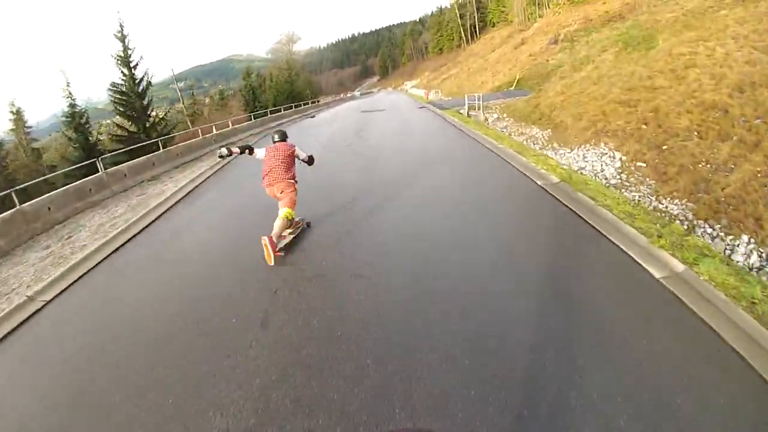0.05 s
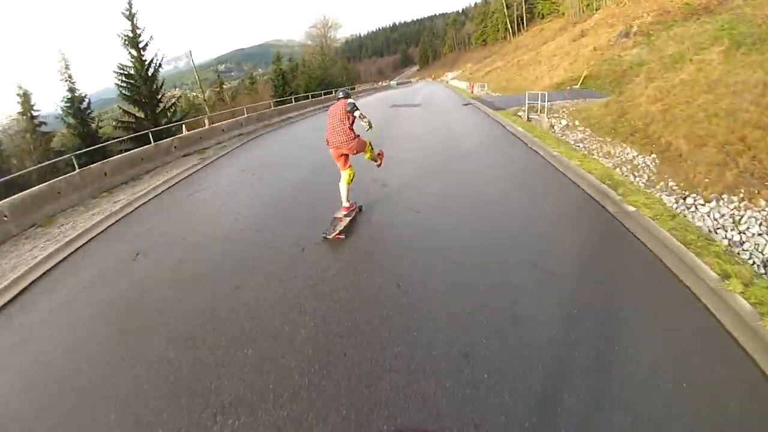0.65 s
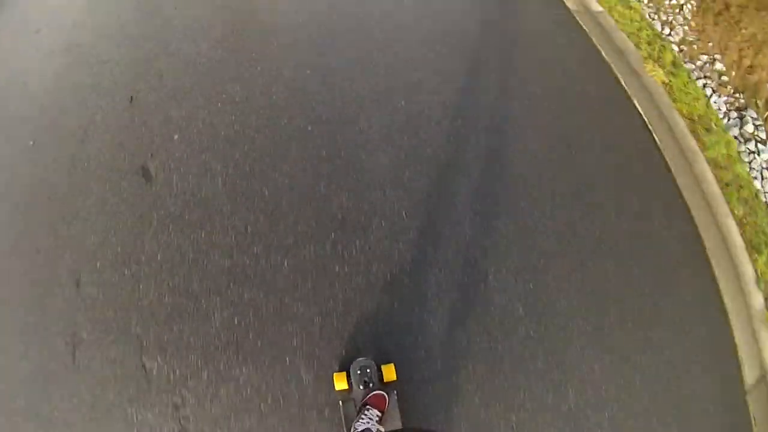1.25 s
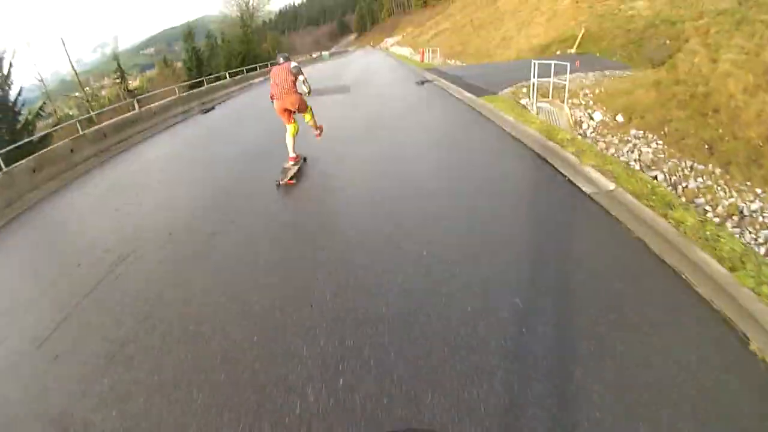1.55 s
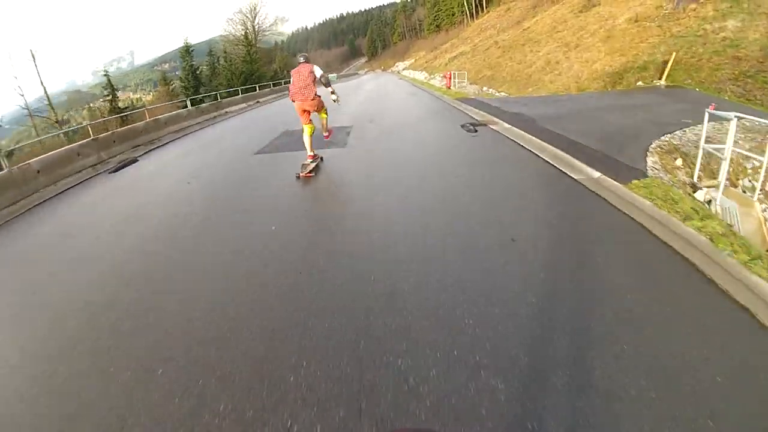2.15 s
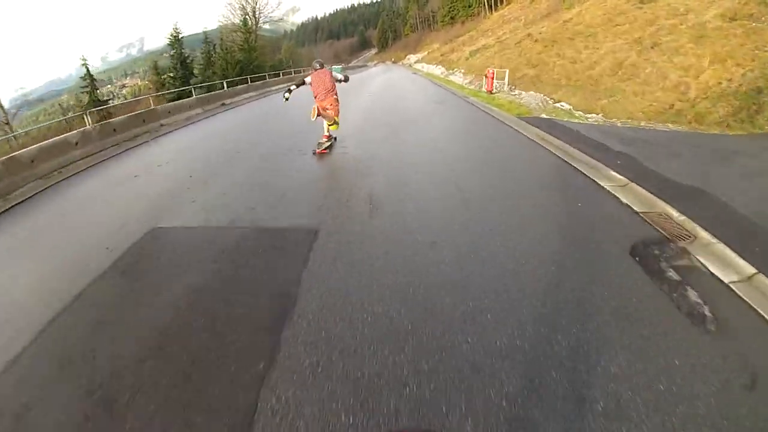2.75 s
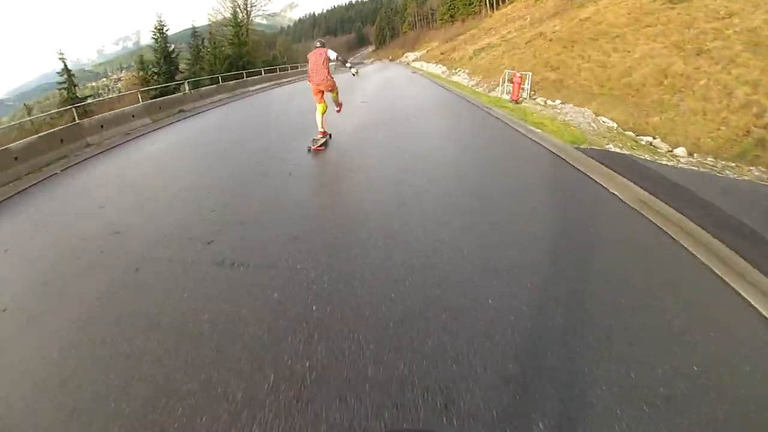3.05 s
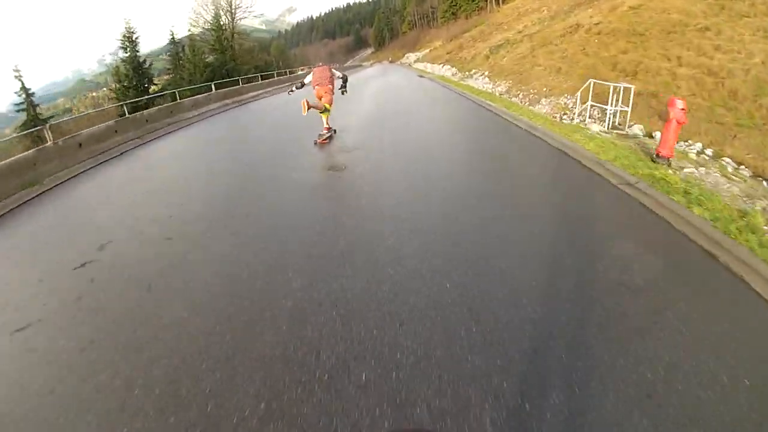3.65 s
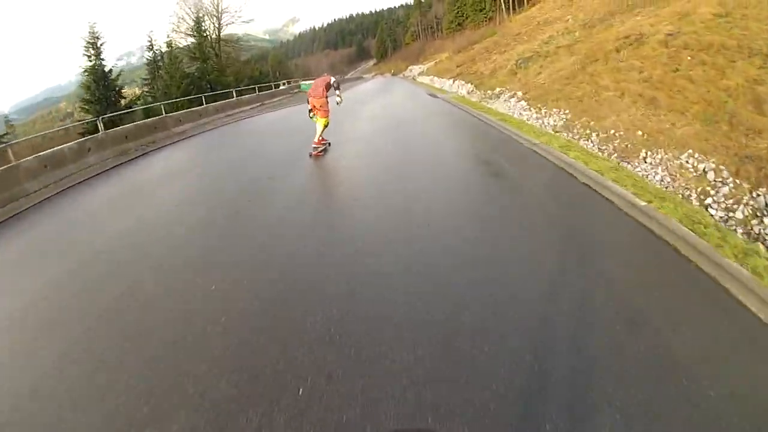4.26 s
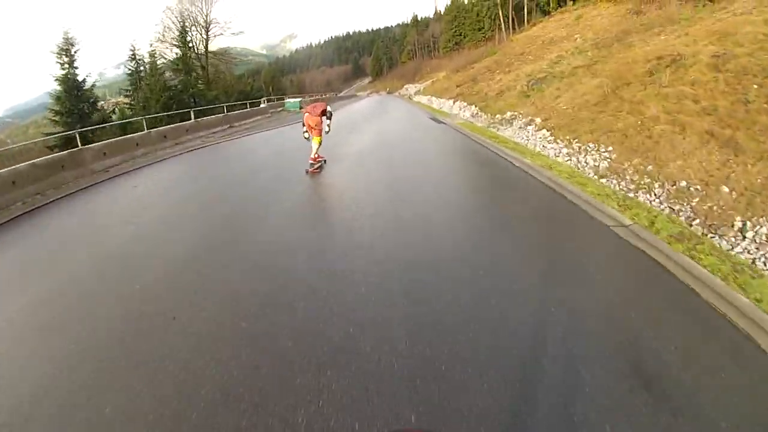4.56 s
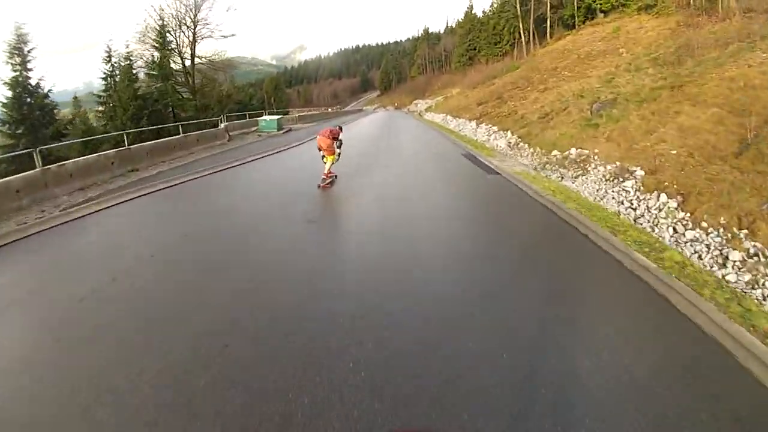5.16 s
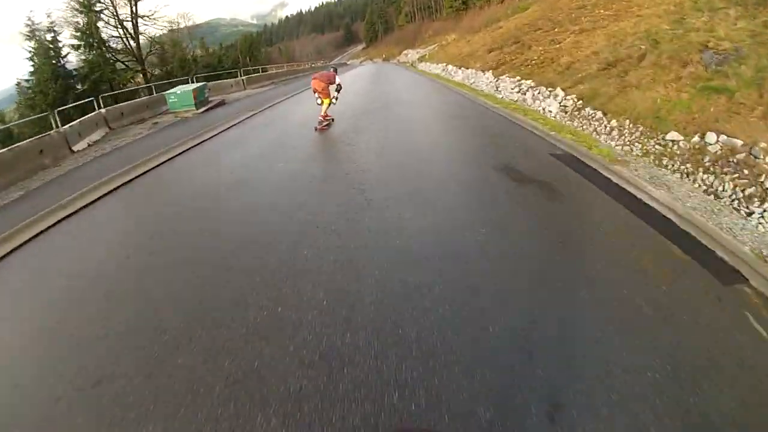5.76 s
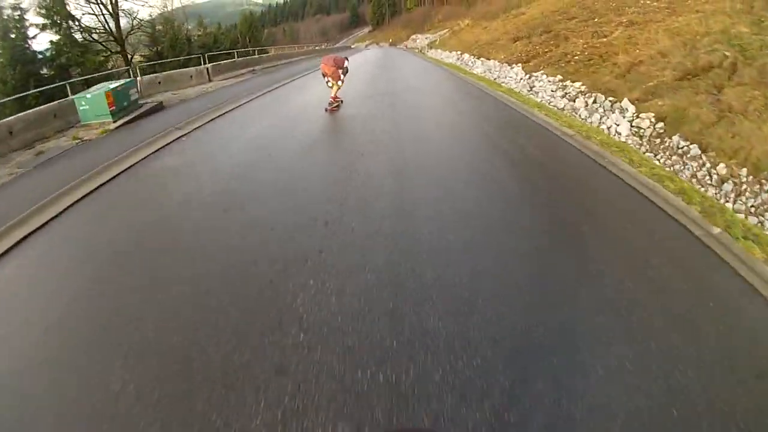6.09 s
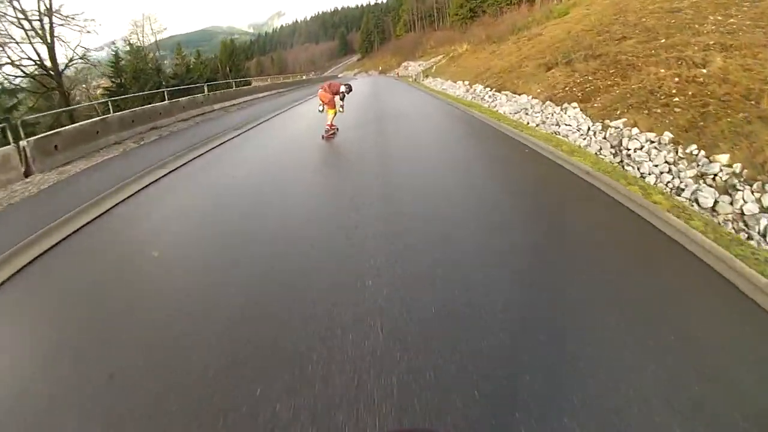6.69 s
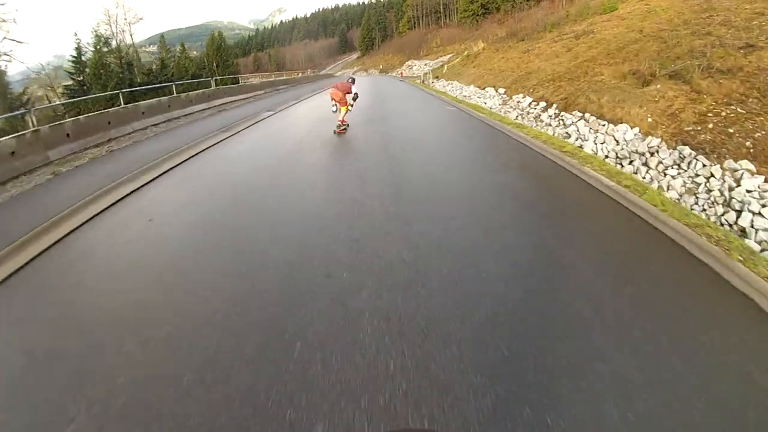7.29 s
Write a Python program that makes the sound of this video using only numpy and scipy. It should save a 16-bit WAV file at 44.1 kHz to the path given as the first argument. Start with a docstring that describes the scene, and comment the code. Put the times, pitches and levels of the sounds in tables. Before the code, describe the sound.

A longboard rolls fast down a wet asphalt road, heard from a microphone on the rider's helmet. The wheels make a steady gritty whir under low, gusting wind. Near the start the camera mount knocks and thumps a few times. The wheels scrub briefly three times and grit ticks now and then, while the rush of air and faint spray grows with speed.

```python
"""Wheels ring on wet asphalt under a low rumble of wind: a longboard gathering speed downhill,
heard from a camera on the rider's helmet. Road grit rings the wheels, trucks and deck while a rush
of air and spray grows; eddies buffet the microphone and set the camera mount droning.
Early on the mount takes a knock and a few jolts, then the rider glances down and the tone shifts.
The wheels scrub in three brief carves, and grit ticks now and then."""
import sys
import numpy as np
from scipy import signal
from scipy.fft import rfft, irfft, next_fast_len
from scipy.io import wavfile
from scipy.ndimage import uniform_filter1d

SR = 44100
rng = np.random.default_rng(int(sys.argv[2]) if len(sys.argv) > 2 else 0)


def to_wav(s):
    """Save 16-bit WAV."""
    ch = np.atleast_2d(s).T  # columns
    pcm = np.round(np.clip(ch, -1, 1) * 32767)  # PCM
    wavfile.write(sys.argv[1], SR, pcm.astype(np.int16))


N = 332073
T = np.arange(N) / SR
HZ = np.fft.rfftfreq(N, 1 / SR)


# The ring of wheels, trucks and deck: pitch_hz, width_hz, facing_ahead_db, looking_down_db
BOARD_MODES = [(226, 33, -2, 0), (453, 116, -1, 1), (614, 460, -9, -11), (1040, 44, -12.5, -6),
               (1340, 274, -0.5, 0.5), (1546, 112, 1.5, 3.5), (2175, 210, -5.5, -4), (2333, 324, -5, -6.5),
               (3230, 360, -12, -29), (3790, 210, -20, -19), (4700, 820, -28.5, -26),
               (6950, 1100, -33, -16.5), (7830, 760, -33.5, -28), (9500, 1400, -58, -33),
               (11060, 750, -33.5, -27)]
def wheels(level_db=-43.5, diameter_m=0.07, glance_db=-1.5, throb_db=0.5, patchy_db=0.5, merge_s=5):
    """Asphalt grit strikes the wheels, a little harder once a turn; head tilt changes the colour."""
    turns_per_s = speed_m_per_s() / (np.pi * diameter_m) * (1 + 0.037 * wander(5.1))
    turns = np.cumsum(turns_per_s) / SR
    contact = amp(throb_db * np.sin(2 * np.pi * turns) + patchy_db * wander(25))
    # single strikes stand out at first and merge as the board gets faster
    strikes = 1.2 * np.exp(-T / merge_s) * grains(1500, 2.9)
    road = (strikes + rng.standard_normal(N)) * contact
    ahead = steady(colour(road, resonances(BOARD_MODES, column=2)), samples=6000)
    down = steady(colour(road, resonances(BOARD_MODES, column=3)), samples=6000)
    tilt = head_tilt()
    gain = amp(level_db + 0.78 * speed_db() + roughness_db() + glance_db * tilt)
    return gain * ((1 - tilt) * ahead + tilt * down)


# The broad tone of the rushing air and water: frequency_hz, gain_db
RUSH_TONE = [(100, 2), (260, 1.5), (400, -2.5), (600, -9), (900, -11.5), (1450, -4.5), (2250, -2.5),
             (2900, -10), (4200, -16.5), (5000, -18), (6000, -20.5), (6700, -22), (8700, -35), (15000, -40)]
# Air ringing the cavities of the camera case, on the same scale: pitch_hz, width_hz, gain_db
CASE_CAVITIES = [(220, 13, 11), (438, 22, 3), (1625, 136, 0.5), (1953, 95, -1), (4930, 160, -16.5),
                 (5410, 140, -18), (6600, 230, -19)]
def air_rush(level_db=-43.5, speed_power=3.03, shelter_db=-6, flutter_db=0.5):
    """Air and water torn up at speed; looking down turns the microphone out of the stream."""
    tone = np.hypot(spectrum(RUSH_TONE), resonances(CASE_CAVITIES))
    turbulence = rng.standard_normal(N) + 0.3 * grains(2500, 3.5)
    hiss = unit(colour(turbulence, tone))
    drive_db = speed_power * speed_db() + roughness_db()
    return hiss * amp(level_db + drive_db + shelter_db * head_tilt() + flutter_db * wander(22))


# The deep rumble of wind on the microphone: frequency_hz, gain_db
BUFFET_TONE = [(6, 5), (14, 1), (28, 4), (48, -7.5), (90, -14.5), (200, -32), (600, -62.5), (4000, -105)]
# The fader on that rumble, before gusts: time_s, level_db
BUFFET_FADER = [(0, -42.5), (0.7, -33.5), (2.7, -42), (4.2, -43), (5.7, -37.5), (7.53, -45)]
# The low drone of the mount swaying: pitch_hz, width_hz, gain_db
SWAY_MODES = [(65, 6.9, 5.5), (64.3, 45, -7)]
# The higher drone of the mount shaking: pitch_hz, width_hz, gain_db
SHAKE_MODES = [(97.4, 35, -9), (109.2, 13, -5.5), (122.4, 14.2, -3), (165.5, 19.4, -20)]
def wind(sway_db=-40.5, sway_power=1.02, shake_db=-38, shake_power=2.5, lumpy_db=0.24):
    """Eddies push on the microphone and ring the mount's low resonances; the drone grows with speed."""
    def rumble(tone):
        noise = colour(rng.standard_normal(N), tone)
        return steady(noise, samples=4500) * amp(lumpy_db * wander(3.3))

    buffet = rumble(spectrum(BUFFET_TONE)) * amp(curve(BUFFET_FADER) + gust_db(hz=28))
    sway = rumble(resonances(SWAY_MODES)) * amp(sway_db + sway_power * speed_db() + gust_db(hz=65))
    shake = rumble(resonances(SHAKE_MODES)) * amp(shake_db + shake_power * speed_db() + gust_db(hz=122.4))
    return buffet + sway + shake


# Eddies that hit the helmet, and one lull: centre_s, lift_db, half_length_s, centre_hz
EDDIES = [(0.43, 15, 0.069, 22.5), (1.078, 10, 0.097, 33), (1.413, 13, 0.099, 73), (2.476, 12, 0.075, 61),
          (2.94, 9.5, .13, 67), (3.826, 10, 0.018, 95), (4.395, 2.5, 0.13, 125), (4.624, 7.5, 0.04, 62),
          (5.4, -3, 0.45, 109.4), (5.845, 8, 0.022, 66), (5.977, 8.5, 0.032, 125), (6.74, 9.5, 0.081, 128),
          (7.137, 15.5, 0.1, 63), (7.263, 10, 0.041, 122), (7.44, 10, .08, 65)]
def gust_db(hz, spread_octaves=0.49):
    """Each eddy swells and fades in a bell, lifting most the vibrations near its own frequency."""
    lift_db = np.zeros(N)
    for centre_s, db, half_s, centre_hz in EDDIES:
        octaves_away = np.log2(hz / centre_hz)
        lift_db += db * bell((T - centre_s) / half_s) * bell(octaves_away / spread_octaves)
    return lift_db


# Dull thumps of the mount: centre_s, peak_db, half_length_s
MOUNT_JOLTS = [(0.355, -19.5, 0.022), (0.3635, -6.5, 0.0035), (0.4, -14, 0.0112), (0.516, -14.5, 0.019)]
def jolts():
    """A jolt shoves the microphone through the air and back: one dull pressure pulse."""
    out = np.zeros(N)
    for centre_s, peak_db, half_s in MOUNT_JOLTS:
        offset = (T - centre_s) / half_s
        out += amp(peak_db) * (1 - offset ** 2) * bell(offset)
    return out


# The clack of the knocked mount: pitch_hz, pole_width_hz, peak_db, burst_t60_s
KNOCK_MODES = [(374, 390, -34, .05), (1960, 5000, -28.5, 0.024), (3030, 440, -36.5, 0.015),
               (5670, 5000, -41.5, 0.022)]
# Ticks of grit and rattles of the mount: start_s, peak_db, pitch_hz, pole_width_hz, burst_t60_s
GRIT_AND_RATTLES = [(0.3625, -42, 6000, 16000, .012), (0.4490, -36.5, 350, 330, .06),
                    (0.8980, -35, 2500, 2800, .028), (0.9823, -47, 5700, 2600, .035),
                    (1.7438, -29.5, 2250, 1500, .02), (2.4355, -51, 11200, 3000, .011),
                    (2.7313, -41, 5900, 3800, .017)]
def knock_and_ticks(knock_s=0.336, rise_s=0.0016):
    """Each contact is a burst that builds and dies quickly; a tick rings one band, the knock several."""
    out, t = np.zeros(N), np.arange(4096) / SR
    knock = [(knock_s, db, hz, width, t60) for hz, width, db, t60 in KNOCK_MODES]
    for start_s, peak_db, pitch_hz, width_hz, t60_s in knock + GRIT_AND_RATTLES:
        burst = rng.standard_normal(len(t)) * np.clip(t / rise_s, 0, 1) * amp(-60 * t / t60_s)
        pole = np.exp((-np.pi * width_hz + 2j * np.pi * pitch_hz) / SR)
        ring = signal.lfilter([1], np.poly([pole] * 4), burst).real
        out[round(start_s * SR):][:len(t)] += amp(peak_db) * ring / abs(ring).max()
    return out


# Wheels scrubbing sideways as the board turns: centre_s, level_db, half_length_s, pitch_hz, width_hz
CARVES = [(0.968, -41.5, 0.068, 1440, 320), (1.717, -46, 0.12, 1490, 372), (2.596, -51, 0.11, 2360, 450)]
def scrubs():
    """In a carve the urethane slips in tiny jerks and the wheels roar up for a moment."""
    out = np.zeros(N)
    for centre_s, level_db, half_s, pitch_hz, width_hz in CARVES:
        slips = colour(grains(2300, 2.7), resonances([(pitch_hz, width_hz, 0)]))
        out += steady(slips, samples=3000) * amp(level_db) * bell((T - centre_s) / half_s)
    return out


# The bright fizz of droplets: frequency_hz, gain_db
SPRAY_TONE = [(2000, -22), (6000, 6.5), (8500, 4.5), (11500, 4), (13000, 4), (15000, -2.5)]
def spray(level_db=-69, road_share=0.44, flutter_db=1.5):
    """Fine droplets fizz off the wet wheels, more at speed and on coarse asphalt."""
    droplets = grains(3600, 3.5) + rng.standard_normal(N)
    fizz = unit(colour(droplets, spectrum(SPRAY_TONE)))
    return fizz * amp(level_db + speed_db() + road_share * roughness_db() + flutter_db * wander(17))


def near_echo(x, start_s=0.42, end_s=0.86, fade_s=0.071, strength=0.85, low_cut_hz=1900):
    """A small surface, briefly close, throws back treble: one drifting reflection, a hollow ring."""
    send = strength * np.clip(np.minimum(T - start_s, end_s - T) / fade_s, 0, 1)
    delay_s = np.interp(T, (start_s, end_s), (0.00333, 0.00324))
    treble = colour(x, HZ ** 2 / (HZ ** 2 + low_cut_hz ** 2))
    reflection = np.interp(T - delay_s, T, treble)
    return (x + send * reflection) / np.sqrt(1 + send ** 2 / 2)


# The rider's glance down: time_s, tilt
HEAD_MOVES = [(0.86, 0), (1.04, 0.71), (1.5, 1), (1.6, 0.21)]
def head_tilt():
    """Where the helmet points: 0 facing down the road, 1 looking at the board."""
    return curve(HEAD_MOVES)


# Coarser and smoother stretches of road: time_s, roughness_db
ASPHALT = [(0, 0), (0.3, -2), (0.7, 1), (2.25, -0.66), (2.65, 1), (3.3, 0.2), (4.85, -0.25), (5.4, 1.6),
           (6.05, -1.74), (6.75, 2.2), (7.53, 2.5)]
def roughness_db():
    """Coarse asphalt makes the ride louder, smooth asphalt softer."""
    return curve(ASPHALT)


def speed_m_per_s(start_m_per_s=7.525, accel_m_per_s2=0.64):
    """The board gains speed evenly down the slope."""
    return start_m_per_s + accel_m_per_s2 * T


def speed_db(cruise_m_per_s=10):
    """Speed in dB over cruising speed; a factor on it makes a source grow as that power of speed."""
    return 20 * np.log10(speed_m_per_s() / cruise_m_per_s)


def amp(db):
    """Decibels to gain."""
    return 10 ** (np.asarray(db) / 20)


def unit(x):
    """Scales to rms 1."""
    return x / np.sqrt(np.mean(x ** 2) + 1e-20)


def bell(x):
    """A Gaussian swell that peaks at 1."""
    return np.exp(-x ** 2 / 2)


def curve(points):
    """A control at every sample from (time_s, value) points."""
    return np.interp(T, *np.transpose(points))


def spectrum(points):
    """Gain at every frequency from (frequency_hz, gain_db) points."""
    hz, db = np.transpose(points)
    return amp(np.interp(np.log(HZ + 1), np.log(hz), db))


def resonances(rows, column=2):
    """Gain at every frequency of steep-sided resonances that add in power; column picks their dB."""
    peaks = (amp(row[column]) / (1 + (1.57 * (HZ - row[0]) / row[1]) ** 2) for row in rows)
    return np.sqrt(sum(peak ** 2 for peak in peaks))


def colour(x, gain):
    """Filters x by a gain over frequency."""
    size = next_fast_len(N, True)
    bin_gain = np.interp(np.fft.rfftfreq(size, 1 / SR), HZ, gain)
    return irfft(rfft(x, size) * bin_gain, size)[:N]


def wander(rate_hz):
    """Smooth random drift of rms 1, up to about the given rate."""
    return unit(colour(rng.standard_normal(N), np.exp(-(HZ / rate_hz) ** 2)))


def steady(x, samples):
    """Holds a noise near rms 1 over stretches of this many samples."""
    power = uniform_filter1d(uniform_filter1d(x ** 2, samples), samples)
    return x / np.sqrt(abs(power) + 1e-20)


def grains(per_s, spread_db):
    """Random impacts: many small, a few large."""
    strength = amp(spread_db * np.minimum(rng.exponential(1, N), 4.5))
    return unit(strength * rng.choice([-1, 1], N) * (rng.random(N) < per_s / SR))


def scene():
    """Road sounds from below, wind and knocks at the microphone, in mono."""
    rolling = near_echo(wheels() + air_rush())
    return (rolling + scrubs() + spray() + wind() + knock_and_ticks() + jolts())[None]


def record(dry, threshold_db=-13, release_db_per_s=55, squeeze=0.41, cutoff_hz=15350):
    """A limiter ducks everything briefly after peaks like the big jolt; then the camera's band limit."""
    peak_db = 20 * np.log10(abs(dry[0]) + 1e-9)
    fall_db = release_db_per_s * T
    held_db = np.maximum.accumulate(peak_db + fall_db) - fall_db
    over_db = np.maximum(held_db - threshold_db, 0)
    duck_db = squeeze * signal.lfilter(np.ones(300), [300], over_db)
    band_limit = signal.firwin(511, cutoff_hz, window=("kaiser", 9), fs=SR)
    return signal.oaconvolve(dry * amp(-duck_db), band_limit[None], "same")


dry = scene()
out = record(dry)
to_wav(out)
```